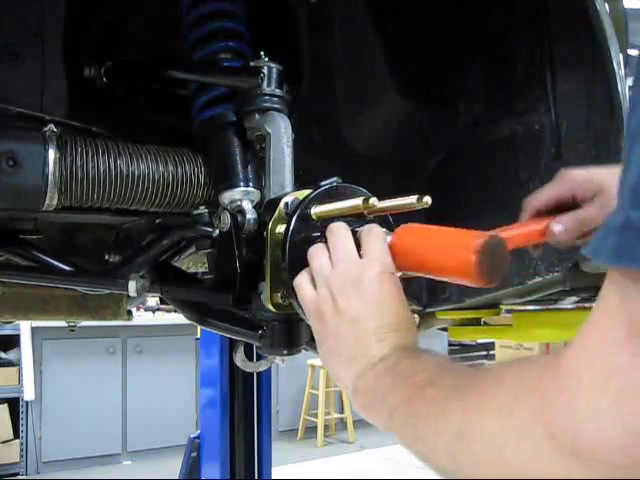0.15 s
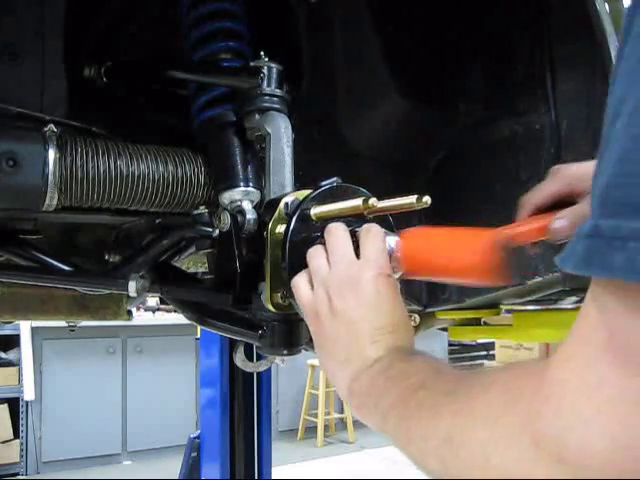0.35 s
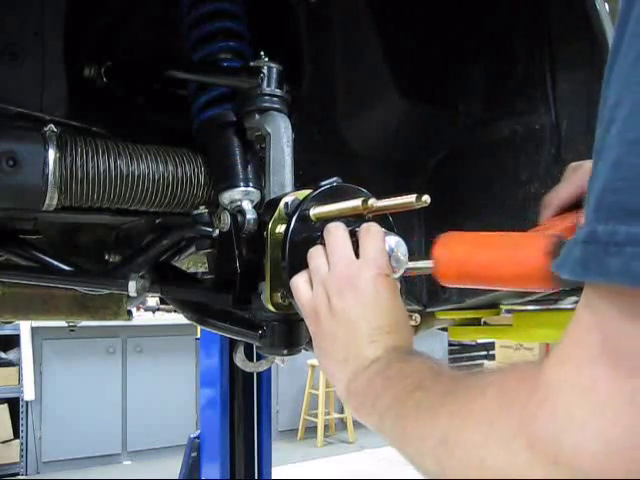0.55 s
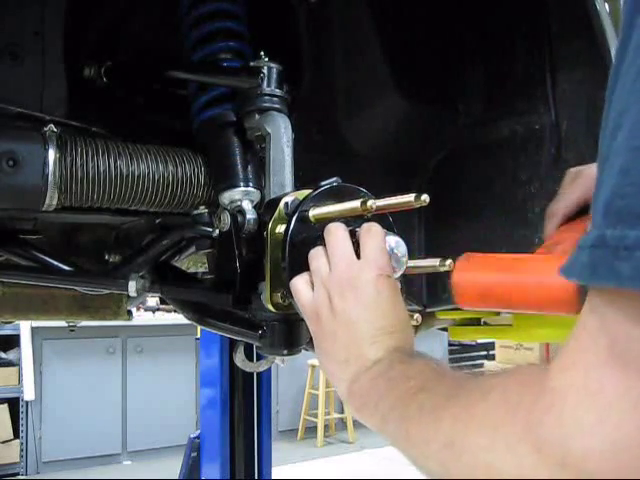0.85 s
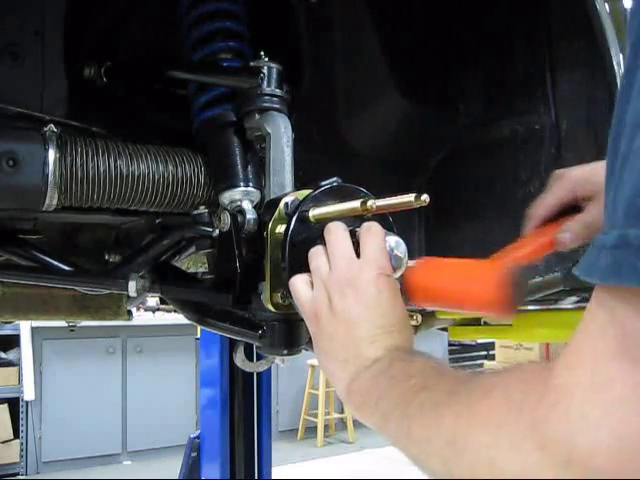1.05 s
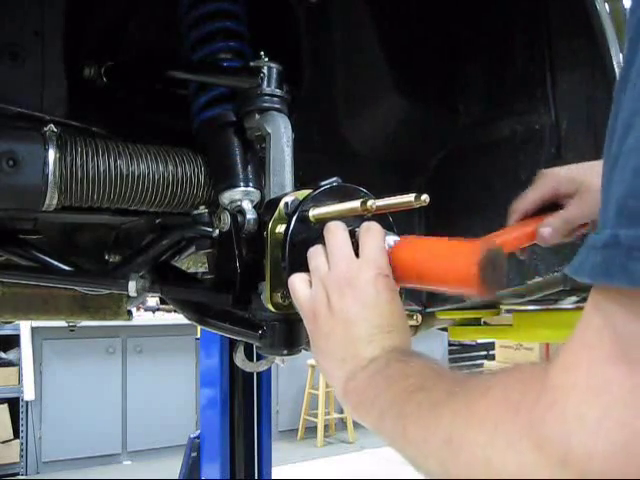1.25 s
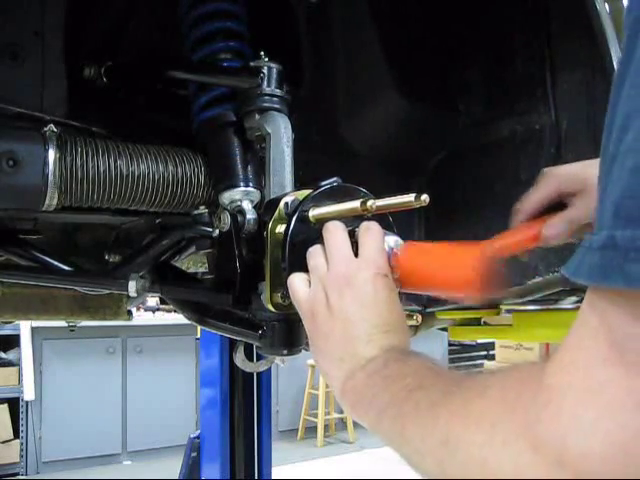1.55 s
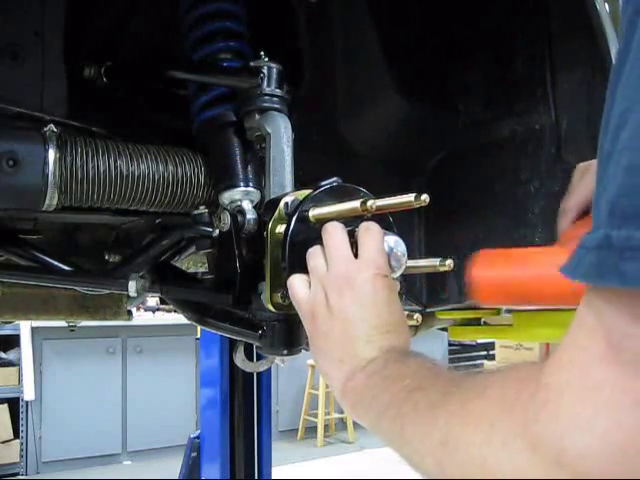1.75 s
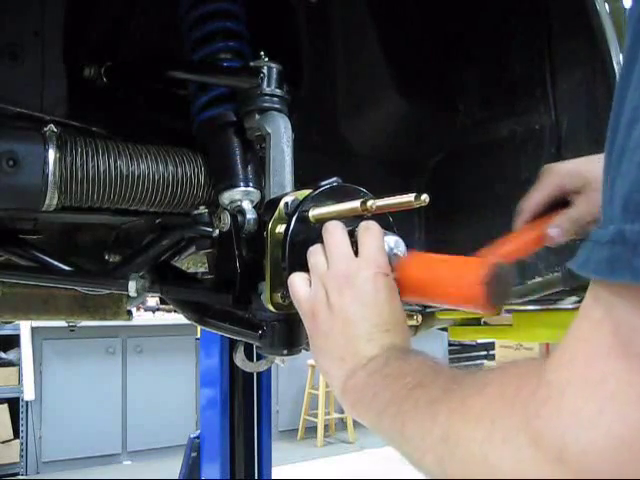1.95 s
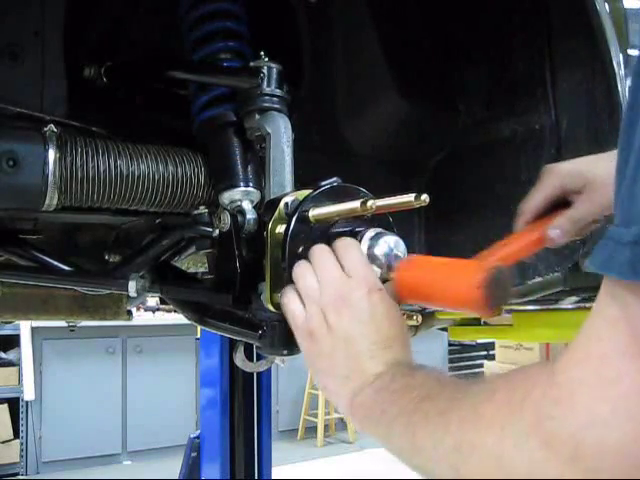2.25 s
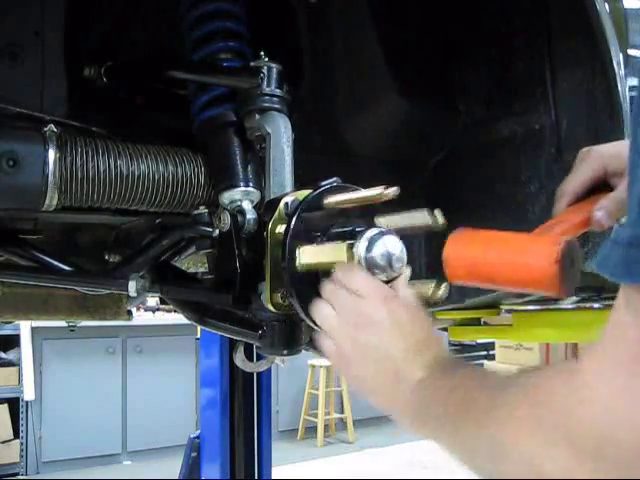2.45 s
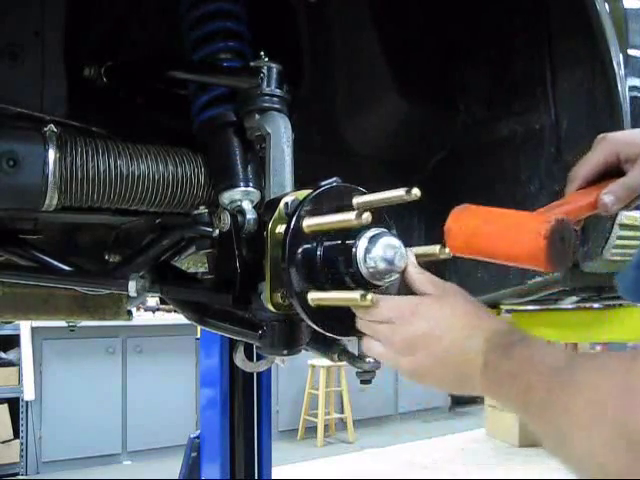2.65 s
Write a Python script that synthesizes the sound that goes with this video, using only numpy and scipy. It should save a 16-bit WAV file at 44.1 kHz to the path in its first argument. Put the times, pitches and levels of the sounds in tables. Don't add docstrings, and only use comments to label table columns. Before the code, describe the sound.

Mallet blows on a steel hub cap, close in a reverberant workshop. A light dry tap at 0.2 seconds, firmer at 0.5, then solid cracks roughly every 0.3 seconds, brightest at 1.7, fullest and last at 2.3. Shot hisses briefly inside the head before most blows. Chassis booms and faint metal ringing swell after each limited crack, then fade over hiss; a tiny rattle at 2.7.

```python
import sys
import numpy as np
from scipy import signal
from scipy.fft import rfft, irfft, next_fast_len
from scipy.io import wavfile
from scipy.ndimage import uniform_filter1d

SR = 44100
rng = np.random.default_rng(int(sys.argv[2]) if len(sys.argv) > 2 else 0)


def voltage_ratio(level):
    return 10 ** (np.asarray(level, float) / 20)


def waveform_to_disk(signal):
    frames = np.transpose(np.atleast_2d(signal))
    scaled = np.clip(frames, -1, 1) * 32767
    samples = np.round(scaled).astype(np.int16)
    wavfile.write(sys.argv[1], SR, samples)


N = 123479

# start_s, cap_dull_db, cap_bright_db, chassis_db, room_send_db
BLOWS = [
    (0.2055, 4.5, 4, -21.5, -14.5),
    (0.4854, 7, 3, -10.5, -13),
    (0.7602, 10.5, 8.5, -4, -11.5),
    (1.0524, 9.5, 9.5, -1.5, -8),
    (1.3498, 10, 9, -2.5, -5.5),
    (1.6679, 13, 19.5, -2, -6),
    (1.9883, 12, 11, -0.5, -8),
    (2.2734, 13, 11, 0, -9.5),
]
# middle_mode_hz, upper_mode_hz, hub_knock_db, fizz_db
CONTACT = [(2685, 4300, 5, -6.5), (3040, 5400, 3.5, -10), (2228, 4000, 7, -9), (2240, 4090, 4, -1),
           (2466, 4800, 4.5, -12), (2320, 5400, -23, -7), (2584, 5200, 9, -15), (1930, 4480, 8.5, -17)]
# ratio, level_db, t60_s
CAP_DULL = [(.8, -0.5, 0.0067), (1.01, 3.5, 0.0076), (1.3, -3.5, 0.011)]
CAP_BRIGHT = [(.85, -4.5, 0.0081), (1.01, 3.5, 0.006), (1.2, -28, 0.003), (1.45, -16.5, 0.015)]
# pitch_hz, level_db, t60_s
HUB = [(457, -4, 0.021), (558, 2.5, 0.027), (614, -13.5, 0.39), (1020, 3, 0.026), (1182, 1.5, 0.025),
       (1504, 1, 0.045)]
# pitch_hz, level_db, t60_s
FIZZ = [(6700, 0, .006), (9300, -3, .005), (10500, -1, .005), (13500, -9, .006)]
DETUNE, MODE_SCATTER_DB = 0.02, 1.5
SNAP_DB, SNAP_T60_S = -5.5, 0.022
BRIGHT_RISE_S, DULL_RISE_S = 0.00019, 0.00092

# delay_s, level_db
ECHOES = [(.0023, -14), (.0036, -13), (.0047, -9.5), (.0061, -11.5), (.0085, -17)]

# pitch_hz, width_hz, level_db
CHASSIS = [(140, 18, -6), (186.7, 21.8, 2), (247.7, 42, -1), (347, 45.3, -0.5), (457.8, 22.6, -4),
           (569, 42, -10.5), (877, 227, -14), (1400, 52, -11)]
BOOM_RISE_S, BOOM_T60_S = 0.004, 0.7
# pitch_hz, level_db, t60_s
STUDS = [(955, -24, 0.79), (1163, -29, 1.4), (1362, -35, 0.29), (4140, -33, 1), (4450, -26, 0.22)]
# pitch_hz, level_db, t60_s
THUD = [(142.3, -5, 0.26), (183.3, 1, 0.23), (208, 1, 0.098), (257, -1, 0.19), (288, -3.5, 0.24),
        (341, -2.5, 0.44), (367.7, 3, 0.3), (438.3, -11, 0.29)]
THUD_DB, THUD_RISE_S = -0.5, 0.02
# pitch_hz, level_db
SHUDDER = [(20, -15), (60, -27), (110, -8), (250, -6), (400, -34)]
SHUDDER_DB, SHUDDER_T60_S = -20.5, 1.7

# pitch_hz, t60_s
ROOM = [(150, 0.79), (700, 0.53), (2500, 0.65), (6000, 0.61), (14000, 0.34)]
ROOM_DELAY_S, ROOM_RISE_S = 0.0047, 0.002
# pitch_hz, level_db
SEND_DULL = [(60, -8), (150, -13.5), (600, 4.5), (1400, -3.5), (2500, -9), (4000, -17), (7000, -55),
             (15500, -20.5)]
SEND_BRIGHT = [(800, 1), (2500, -7), (4000, -2), (5500, 1), (7000, -8), (9000, -6), (12000, -6),
               (15500, -11.5)]
SEND_DULL_DB, SEND_BRIGHT_DB = 13, 8

# peak_s, level_db, length_s
SWINGS = [
    (0.437, -32, .05),
    (0.724, -29.5, .045),
    (1.01, -28, 0.038),
    (1.305, -28.5, 0.044),
    (1.61, -29, 0.053),
    (1.932, -32.5, 0.044),
    (2.228, -26.5, 0.038),
    (2.73, -42, .012),
]
# pitch_hz, level_db
SHOT = [(1500, -30), (3000, -9), (6000, -11), (8500, -3), (11000, -1), (13000, 0), (15500, -1)]
SHOT_SPREAD_DB = 1.5
SHOT_FALL = 0.52

# pitch_hz, level_db
HUM = [(25, 19.5), (60, 4), (130, -8), (500, -5), (1100, -5.5), (3000, -20), (4000, -14), (7000, -17)]
# pitch_hz, level_db
HISS = [(3000, 1.5), (7000, -9.5), (9000, -2.5), (12000, 0.5), (15500, -3.5), (17000, -7)]
# pitch_hz, level_db
FADING = [(300, -23), (900, 2), (2000, 7), (3500, 1), (7000, -8)]
HUM_DB, HISS_DB = -46, -50
FADING_DB, FADING_T60_S = -46.5, 0.79

# pitch_hz, level_db
TONE = [(25, -26), (90, -2.5), (200, -0.5), (7400, -2), (7900, -39), (8100, -22), (8350, -7), (15400, -6.5)]
TOP_HZ = 15550
CEILING_DB, ATTACK_S, RELEASE_DB_PER_S, HARD = -7, 0.007, 150, 12


def unit(x):
    return x / np.sqrt(np.mean(x ** 2) + 1e-20)


def along(points, hz):
    f, v = np.transpose(points)
    return np.interp(np.log(hz + 1), np.log(f + 1), v)


def filtered(x, response):
    m = next_fast_len(len(x) + 8192)
    return irfft(rfft(x, m) * response(np.fft.rfftfreq(m, 1 / SR)), m)[:len(x)]


def rush(spectrum, size):
    inside = lambda hz: voltage_ratio(along(spectrum, hz)) * (hz < spectrum[-1][0])
    return unit(filtered(rng.standard_normal(size), inside))


def ring(modes, t, detune, scale=1):
    hz, db, t60 = np.transpose(modes)[..., None]
    level_luck, pitch_luck = rng.standard_normal((2, len(modes), 1))
    envelope = voltage_ratio(db + MODE_SCATTER_DB * level_luck - 60 * t / t60)
    pitch = scale * hz * (1 + detune * pitch_luck)
    return np.sum(envelope * np.sin(2 * np.pi * pitch * t), 0)


def taps():
    out, t = np.zeros(N + SR), np.arange(SR) / SR
    for (start_s, dull_db, bright_db, chassis_db, wet_db), contact in zip(BLOWS, CONTACT):
        near = filtered(crack(t, dull_db, bright_db, *contact), wheel_arch)
        wet = voltage_ratio(dull_db + SEND_DULL_DB) * room(SEND_DULL)
        wet += voltage_ratio(bright_db + SEND_BRIGHT_DB) * room(SEND_BRIGHT)
        blow = near + voltage_ratio(wet_db + 5) * wet + voltage_ratio(chassis_db - 6.5) * chassis(t)
        out[round(start_s * SR):][:SR] += blow
    return out[:N]


def crack(t, dull_db, bright_db, middle_hz, upper_hz, knock_db, fizz_db):
    snap = voltage_ratio(SNAP_DB - 60 * t / SNAP_T60_S) * rng.standard_normal(len(t))
    fizz = voltage_ratio(fizz_db) * ring(FIZZ, t, 2 * DETUNE)
    bright = voltage_ratio(bright_db - 7.5) * (ring(CAP_BRIGHT, t, DETUNE, upper_hz) + snap + fizz)
    knock = voltage_ratio(knock_db - 16) * ring(HUB, t, DETUNE)
    dull = voltage_ratio(dull_db - 6) * ring(CAP_DULL, t, DETUNE, middle_hz) + knock
    return bright * (1 - np.exp(-t / BRIGHT_RISE_S)) + dull * (1 - np.exp(-t / DULL_RISE_S))


def wheel_arch(hz):
    return 1 + sum(voltage_ratio(db) * np.exp(-2j * np.pi * hz * delay_s) for delay_s, db in ECHOES)


def chassis(t):
    boom = unit(filtered(rng.standard_normal(len(t)), chassis_body)) + 4 * ring(STUDS, t, 0.0076)
    boom *= voltage_ratio(-60 * t / BOOM_T60_S)
    shudder = voltage_ratio(SHUDDER_DB - 60 * t / SHUDDER_T60_S) * rush(SHUDDER, len(t)) * (1 - t)
    thud = voltage_ratio(THUD_DB) * (1 - np.exp(-(t / THUD_RISE_S) ** 2)) * ring(THUD, t, 0.0142)
    return (1 - np.exp(-t / BOOM_RISE_S)) * (boom + shudder) + thud


def chassis_body(hz):
    total = 0
    for k, (centre, width, db) in enumerate(CHASSIS):
        damping = 1j * hz * width
        total = total + (-1) ** k * voltage_ratio(db) * damping / (centre * centre - hz * hz + damping)
    return total


def room(send):
    hz, t, z = signal.stft(rng.standard_normal(SR), SR, nperseg=256)
    decay_db = along(send, hz)[:, None] - 60 * t / along(ROOM, hz)[:, None]
    tail = signal.istft(z * voltage_ratio(decay_db), SR, nperseg=256)[1]
    tail = tail * (1 - np.exp(-np.arange(len(tail)) / (ROOM_RISE_S * SR)))
    return np.pad(tail / np.linalg.norm(tail), (round(ROOM_DELAY_S * SR), 0))[:SR]


def shot():
    t, swing = np.arange(N) / SR, np.zeros(N)
    for peak_s, db, length_s in SWINGS:
        fade_s = length_s / 2.3 * np.where(t > peak_s, SHOT_FALL + 0.1, 1)
        swing += voltage_ratio(db) * np.exp(-np.abs(t - peak_s) / fade_s)
    flutter = unit(uniform_filter1d(rng.standard_normal(N), size=30))
    grains = rng.standard_normal(N) * voltage_ratio(SHOT_SPREAD_DB * flutter)
    return swing * unit(filtered(grains, lambda hz: voltage_ratio(along(SHOT, hz))))


def shop():
    fading = voltage_ratio(FADING_DB - 60 * np.arange(N) / SR / FADING_T60_S) * rush(FADING, N)
    return voltage_ratio(HUM_DB) * rush(HUM, N) + voltage_ratio(HISS_DB) * rush(HISS, N) + fading


def scene():
    return (taps() + shot() + shop())[None]


def low_pass(x):
    return signal.sosfilt(signal.butter(12, 16350, fs=SR, output="sos"), x)


def record(dry):
    x = filtered(dry[0], lambda hz: voltage_ratio(along(TONE, hz)) * (hz < TOP_HZ))
    ramp = RELEASE_DB_PER_S * np.arange(N) / SR
    over_db = np.maximum(20 * np.log10(np.abs(x) + 1e-9) - CEILING_DB, 0)
    duck_db = np.maximum.accumulate(over_db + ramp) - ramp
    keep = np.exp(-1 / (ATTACK_S * SR))
    x = x * voltage_ratio(-signal.lfilter([1 - keep], [1, -keep], duck_db))
    clipped = x / (1 + np.abs(x) ** HARD) ** (1 / HARD)
    x = filtered(clipped, lambda hz: hz < TOP_HZ)
    return low_pass(np.clip(x, -1, 1)[None])


dry = scene()
out = record(dry)
waveform_to_disk(out)
```